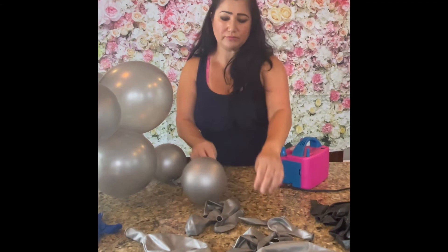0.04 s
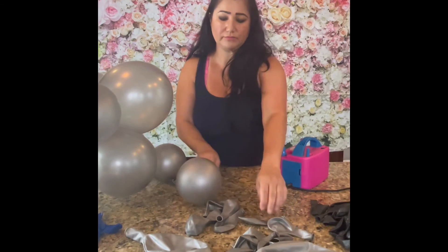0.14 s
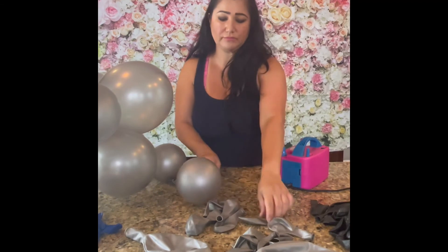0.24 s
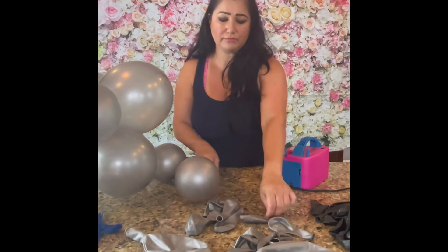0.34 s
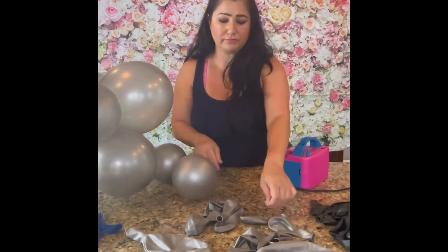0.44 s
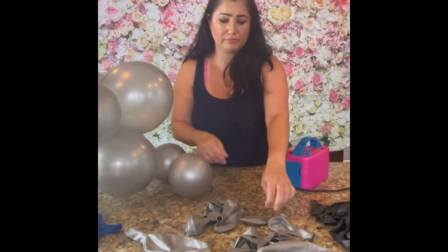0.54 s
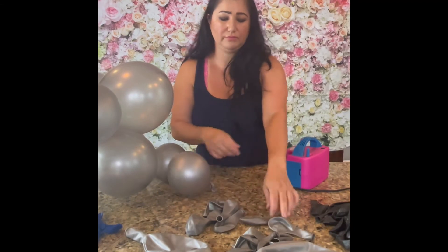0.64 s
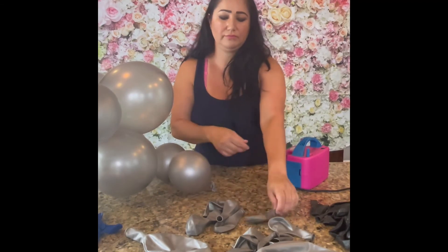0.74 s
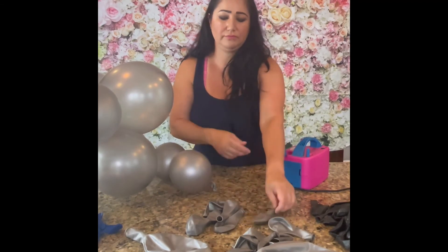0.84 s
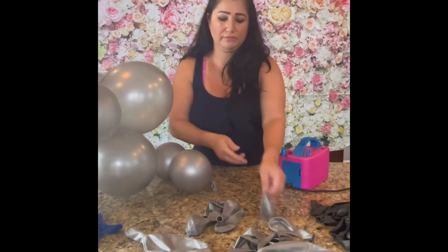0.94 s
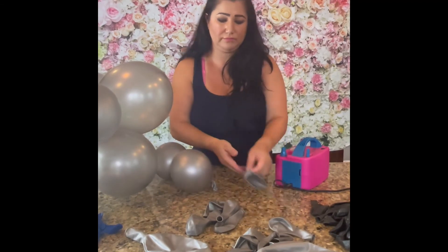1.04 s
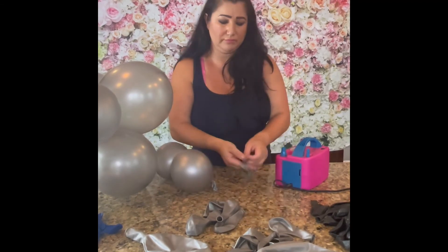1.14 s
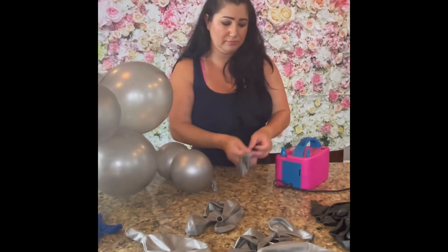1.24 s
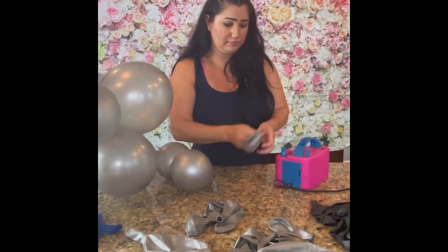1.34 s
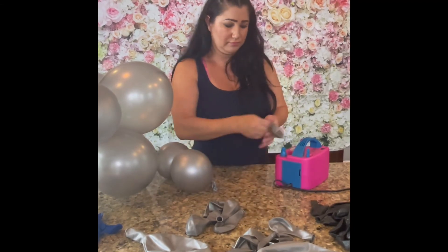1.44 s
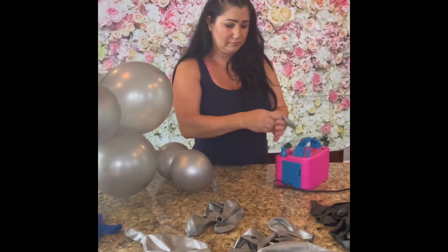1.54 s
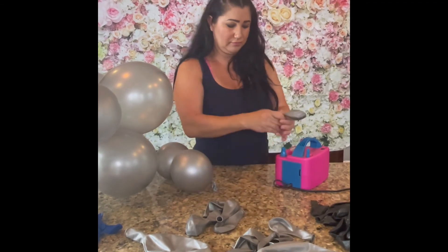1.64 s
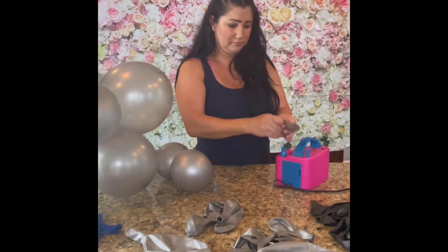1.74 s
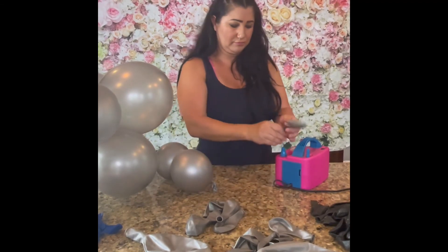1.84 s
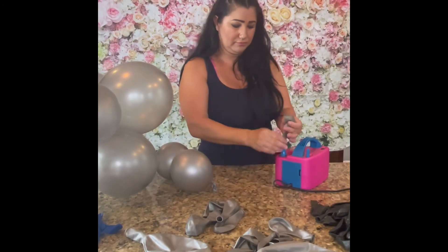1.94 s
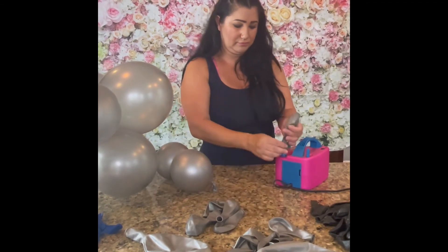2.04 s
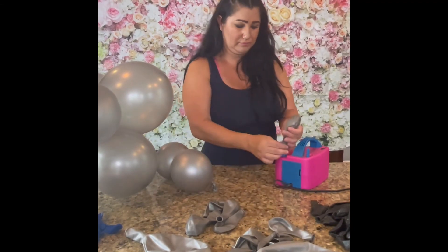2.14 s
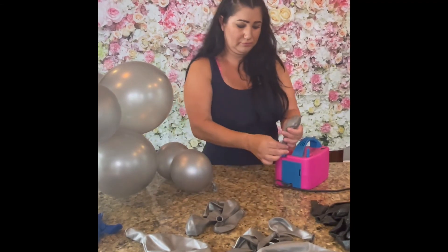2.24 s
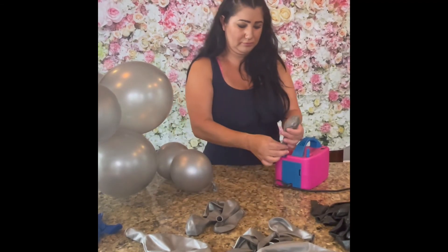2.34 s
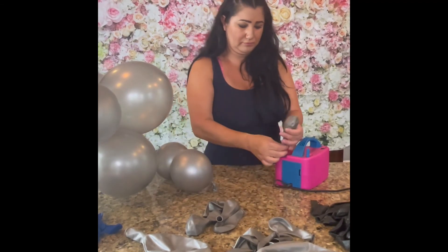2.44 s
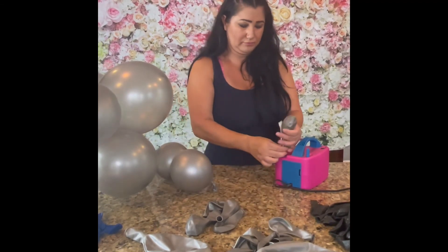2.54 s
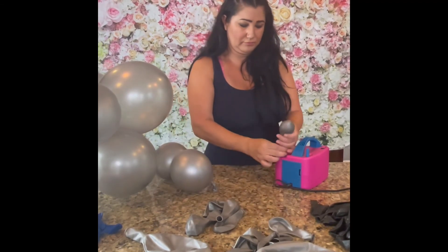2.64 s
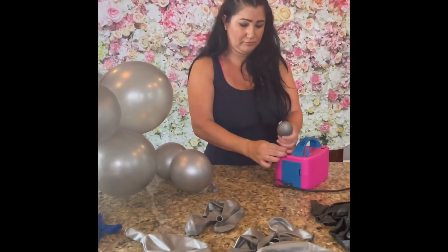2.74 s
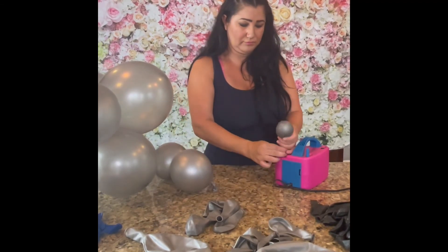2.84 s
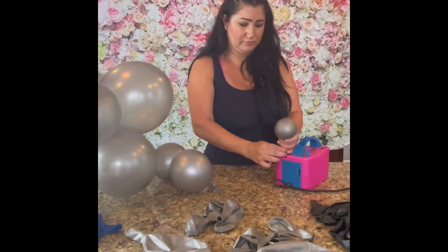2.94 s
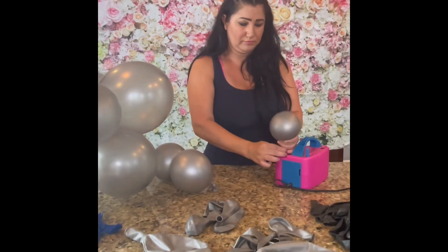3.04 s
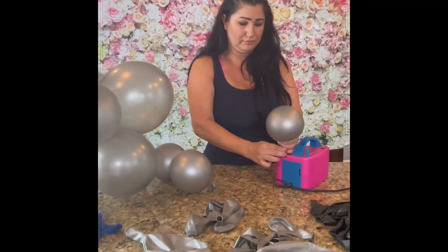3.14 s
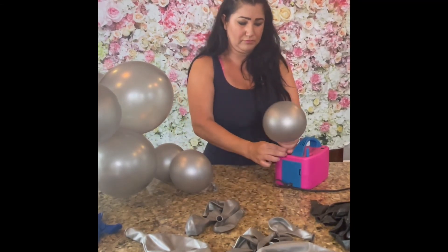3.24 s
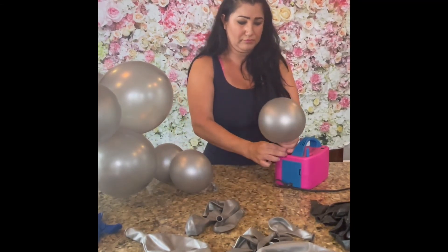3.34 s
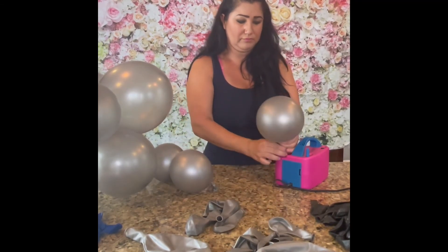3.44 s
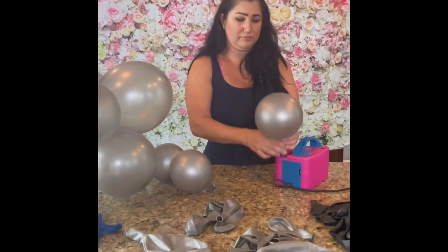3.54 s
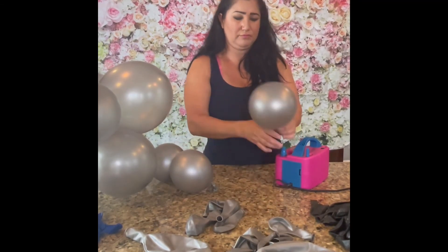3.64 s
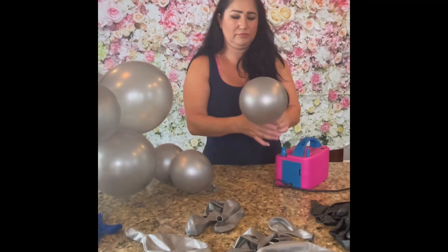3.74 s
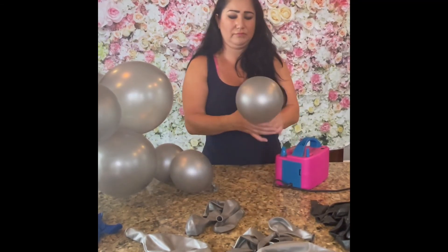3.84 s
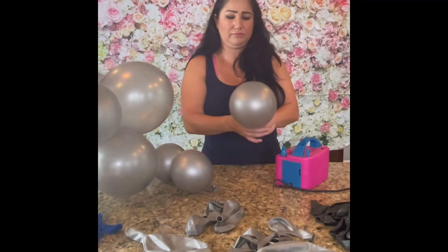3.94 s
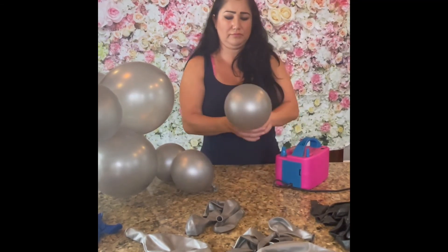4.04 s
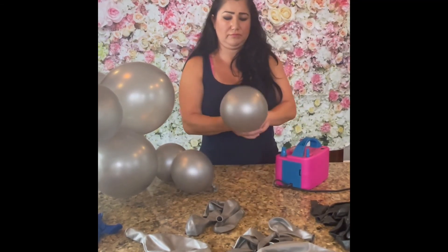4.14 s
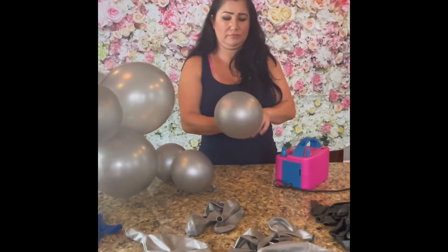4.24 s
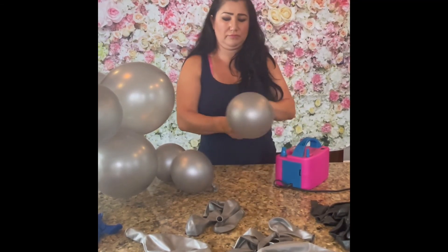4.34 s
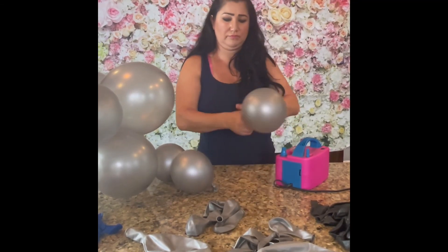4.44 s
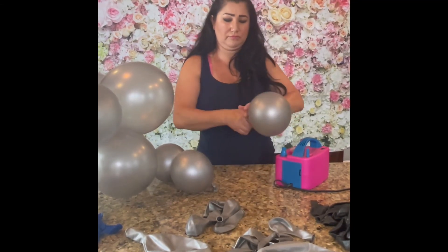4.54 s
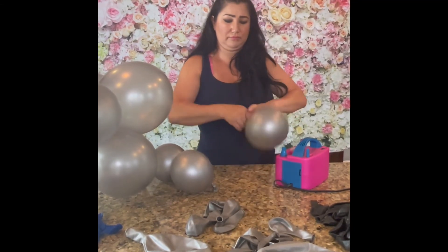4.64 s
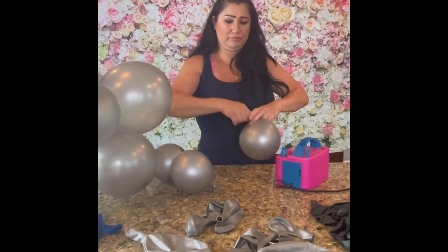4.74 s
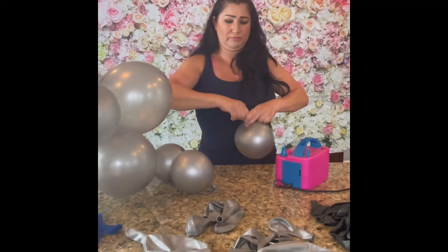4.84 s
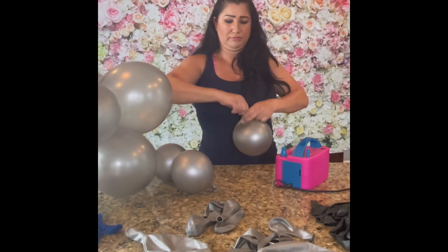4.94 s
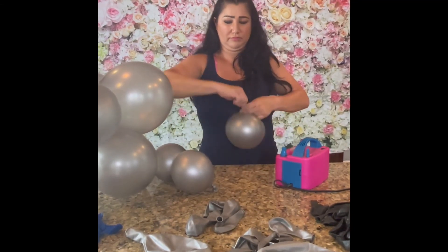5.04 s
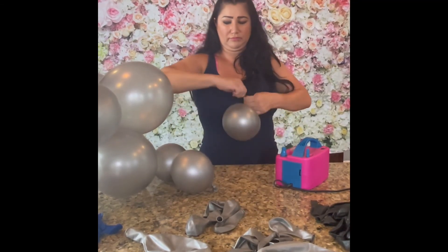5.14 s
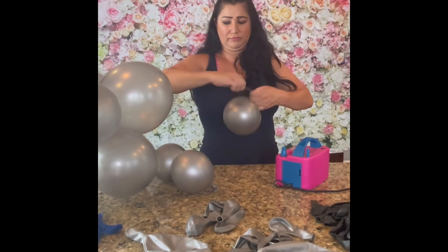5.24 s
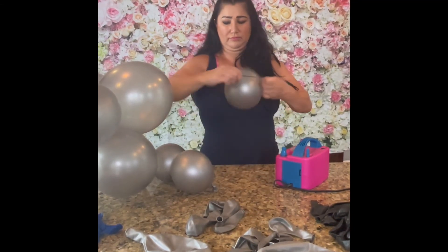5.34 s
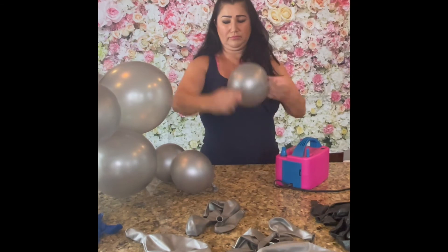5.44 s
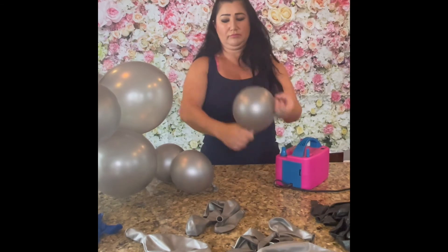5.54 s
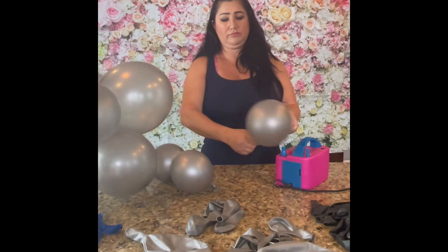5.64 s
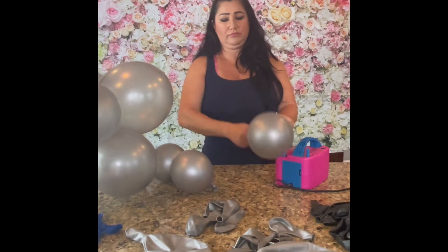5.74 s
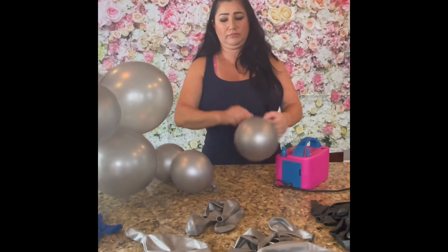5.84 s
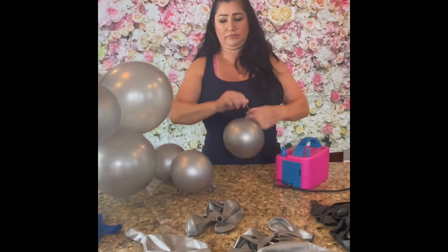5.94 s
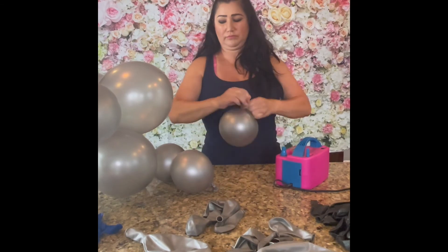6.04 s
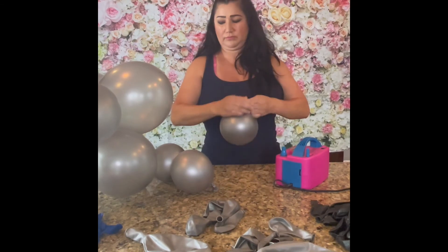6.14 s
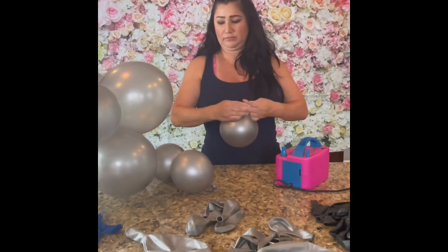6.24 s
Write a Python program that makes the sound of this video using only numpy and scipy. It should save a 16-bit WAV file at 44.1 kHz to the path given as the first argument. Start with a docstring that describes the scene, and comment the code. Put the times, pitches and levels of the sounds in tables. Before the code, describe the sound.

Faint latex rubbing and taps, then a small electric inflator roars for a second, a balloon squeaks off the nozzle, and the fan whirs down.

```python
"""In a room, the fan of an electric inflator still whirs faintly from its last run; a full balloon is knocked,
and fingers rub, tap and rustle limp latex at a stone counter (rubs, swishes: noise; taps, knocks: decaying modes).
The motor is switched on: hum and whine sweep with the shaft, air rushes in, and the latex neck flutters and leaks.
It is switched off and the neck snaps off the nozzle with squeaks and a spill of air, soon pinched shut.
The fan coasts down, its tones and air following one shaft speed, while fingers knock and pluck the balloon to tie it."""
import sys
import numpy as np
from scipy import signal
from scipy.fft import rfft, irfft
from scipy.io import wavfile
from scipy.ndimage import uniform_filter1d

SR = 44100
rng = np.random.default_rng(int(sys.argv[2]) if len(sys.argv) > 2 else 0)


def unload_audio(sound):
    """Save the sound as a 16-bit wav file, at the path given as the first command line argument."""
    columns = np.transpose(np.atleast_2d(sound))
    # keep every value between -1 and 1, then stretch to whole-number steps
    steps = np.round(np.clip(columns, -1, 1) * 32767)
    wavfile.write(sys.argv[1], SR, steps.astype(np.int16))


N = 277830
T = np.arange(N) / SR
FREQS = np.fft.rfftfreq(2 * N, 1 / SR)

# the switch is pressed and let go, the neck slips off the nozzle
ON_S, OFF_S, RELEASE_S = 2.525, 3.42, 3.545
# the shaft creeps towards its top speed (turns per second); a bend under 1 makes the start steeper
TOP_SPEED_HZ, SPIN_UP_S, SPIN_UP_BEND = 682.7, .192, .8
STICK_S = .012  # the rotor sticks for a moment before it turns
# share of the speed lost to the bearings and, at top speed, to the air
FRICTION_PER_S, DRAG_PER_S = .345, .325


def shaft():
    """Rotor dynamics: turns per second, driven up while switched on, then braked by friction and air drag."""
    running = np.minimum(since(ON_S + STICK_S), OFF_S - ON_S - STICK_S)
    driven = TOP_SPEED_HZ * (1 - np.exp(-(running / SPIN_UP_S) ** SPIN_UP_BEND))
    braking = (1 + DRAG_PER_S / FRICTION_PER_S) * np.expm1(FRICTION_PER_S * since(OFF_S))
    return driven / (1 + braking)


# the hum's rise, and its ring after switching off
HUM_ATTACK_S, HUM_T60_S = 0.066, 0.86


def power():
    """Switching transient: a smooth rise to 1 after switching on, an exponential decay after switching off."""
    return envelope(ON_S + STICK_S, HUM_ATTACK_S, OFF_S, HUM_T60_S)


# gain at standstill, and its drop at top speed
STALL_DB, BACK_EMF_DB = -11, -39


def current(speed):
    """Back-EMF: the motor draws most at standstill and less as it gathers speed."""
    return power() * undb(STALL_DB + BACK_EMF_DB * speed / TOP_SPEED_HZ)


HUM_HZ = 120
# overtones of the mains hum: multiple of HUM_HZ, relative level/dB
HUM_OVERTONES = [(1, 4.5), (2, -19.5), (3, -22.5), (5, -37)]


def mains_hum(speed):
    """Magnetic force: the current makes the iron hum in harmonics of a fixed frequency."""
    mains = 2 * np.pi * HUM_HZ * T
    return current(speed) * sum(undb(db) * np.sin(k * mains) for k, db in HUM_OVERTONES)


# overtones of the unbalanced fan: multiple of the shaft speed, relative level/dB
FAN_OVERTONES = [(1, 0.5), (2, -18)]
# modes of the inflator on the counter, which the tone sweeps through: f/Hz, width/Hz, relative level/dB
MOUNT_MODES = [(172, 94, -5), (213.7, 15.4, 0.5), (244.8, 6.2, 6.5), (282, 7.5, 0.5), (315, 40, -4.5),
               (413, 10.2, 1.5), (461.5, 8.2, -0.5), (484, 16.3, 1), (530.5, 20, 1), (563.6, 5.7, -3),
               (596, 13.6, 0), (619.5, 14.5, 0.5), (637.6, 7, -0.5), (667.3, 10.5, 8.5)]
MOUNT_BUILD_S = 0.044  # the modes take time to build, so a fast sweep passes them smoothly
# gain at top speed, and the extra while the motor pulls
UNBALANCE_DB, PULL_DB = -26, 4


def fan_tone(speed, turn, waver_db=1.34):
    """Rotating unbalance: the force grows with speed squared and swells at each mode it passes."""
    tone = sum(undb(db + waver_db * k * walk(25.254)) * np.sin(k * turn) for k, db in FAN_OVERTONES)
    mode_gain = np.interp(speed, FREQS, abs(resonances(MOUNT_MODES)))
    swell = uniform_filter1d(mode_gain, int(MOUNT_BUILD_S * SR))
    force = (speed / TOP_SPEED_HZ) ** 2
    return tone * force * swell * undb(UNBALANCE_DB + PULL_DB * power())


# whistle of the fan blades at top speed: multiple of the shaft speed, level/dB
BLADE_OVERTONES = [(7, -36)]


def blade_whistle(speed, turn, shake, waver_db=4.5, growth=4):
    """Blade passing: a multiple of the shaft speed whistles in fits, louder with speed."""
    tones = sum(undb(db + waver_db * walk(23.09)) * np.sin(k * turn + 0.9 * shake) for k, db in BLADE_OVERTONES)
    return tones * (speed / TOP_SPEED_HZ) ** growth


# modes of the panels that the rattling rotor shakes: f/Hz, width/Hz, relative level/dB
PANEL_MODES = [(644, 14, -6), (685, 16, 4), (726.5, 16, 6.5), (760, 22, -2), (793, 30, 0), (840, 27, -13),
               (1194, 50, -17), (1230, 70, -16)]
# the rotor rattles in its bearings around one critical speed
CRITICAL_HZ, CRITICAL_OCTAVES = 243, 0.38
RATTLE_DB = -45


def bearing_rattle(speed, turn, shake, waver_db=-0.8):
    """Critical speed: a loose rotor's lines swell and beat as they slide through the panel modes."""
    third = np.sin(3 * turn + shake)
    fifth = np.sin(5 * turn + shake)
    octaves_off = np.log2((speed + 1) / CRITICAL_HZ)
    loose = np.exp(-(octaves_off / CRITICAL_OCTAVES) ** 2)
    shaken = through((third + fifth) * loose, resonances(PANEL_MODES))
    return shaken * undb(RATTLE_DB + waver_db * walk(30))


def motor(speed, wobble=0.00278):
    """Superposition: the mains hum adds to fan tones whose phase is the integral of one wobbling shaft speed."""
    turn = 2 * np.pi * np.cumsum(speed * (1 + wobble * walk(40))) / SR
    # the rotor shakes, which smears its upper tones
    shake = 2 * np.pi * np.cumsum(speed * .031 * walk(900)) / SR
    tones = mains_hum(speed) + fan_tone(speed, turn)
    tones += blade_whistle(speed, turn, shake) + bearing_rattle(speed, turn, shake)
    return np.sqrt(2) * tones


# whine of the armature: multiple of the shaft speed, relative level/dB
SLOT_OVERTONES = [(3, 7), (4, -15), (12, 2.5), (24, -15)]
# resonances of the plastic housing: f/Hz, width/Hz, relative level/dB
HOUSING_MODES = [(1235, 236, -4), (2340, 270, -18), (3450, 370, 2), (4630, 400, 6.5), (5540, 780, -7)]
RADIATE_HZ = 1080  # the small housing hardly radiates the whine below this
# gain at standstill, its drop at top speed and its rise
WHINE_DB, WHINE_DROP_DB, WHINE_ATTACK_S = -12, -31, 0.089


def whine(speed, shake=0.031, buzz=0.4, stutter_db=3.5):
    """Slot harmonics: they sweep through the housing's resonances, throb with the hum and fade with current."""
    turn = 2 * np.pi * np.cumsum(speed * (1 + shake * walk(900))) / SR
    slots = sum(undb(db + stutter_db * walk(90)) * np.sin(k * turn) for k, db in SLOT_OVERTONES)
    throb = 1 + buzz * np.sin(2 * np.pi * HUM_HZ * T)
    pull = envelope(ON_S, WHINE_ATTACK_S, OFF_S, HUM_T60_S)
    pull *= undb(WHINE_DB + WHINE_DROP_DB * speed / TOP_SPEED_HZ)
    radiation = 1 / (1 + (RADIATE_HZ / (FREQS + 1)) ** 7)
    return through(slots * throb * pull, resonances(HOUSING_MODES) * radiation)


# spectrum of turbulence in the fan: f/Hz, relative level/dB
CHURN_SPECTRUM = [(40, -27), (130, -4), (300, 2), (550, -0.5), (850, 2.5), (1220, -2.5), (1550, -12.5),
                  (2200, -3), (3300, -3.5), (5000, -42)]
# gain at top speed, and the power of the speed it follows
CHURN_DB, CHURN_POWER = -32, 1.436
BRUSH_DB = -9  # scrape of the brushes, against the current gain


def churn(speed):
    """Turbulence: low noise follows a power of the speed; the brushes' scrape adds in energy."""
    turbulence = undb(CHURN_DB) * (speed / TOP_SPEED_HZ) ** CHURN_POWER
    return flickering(CHURN_SPECTRUM, np.hypot(turbulence, undb(BRUSH_DB) * current(speed)))


# spectrum of the outlet's rush: f/Hz, relative level/dB
RUSH_SPECTRUM = [(1000, -33), (1700, -6.5), (2200, -7), (3300, 4), (4200, 2.5), (4700, 2.5), (5200, 2),
                 (6100, 0.5), (7200, 2.5), (8300, 12), (9600, -25), (11000, -51)]
# gain at top speed, power of the speed, and the drop as the balloon fills
RUSH_DB, RUSH_POWER, RUSH_CHOKE_DB = -23, 2.16, -3.5
FLUTTER_AIR_DB = -2  # air that leaks past the fluttering neck, against its rasp


def rush(speed):
    """Jet noise: it follows a power of the speed, throttled by the filling balloon; flutter leaks add in energy."""
    outlet = undb(RUSH_DB + RUSH_CHOKE_DB * fill()) * (speed / TOP_SPEED_HZ) ** RUSH_POWER
    return flickering(RUSH_SPECTRUM, np.hypot(outlet, undb(FLUTTER_AIR_DB) * swells(FLUTTER_BOUTS)))


# spectrum of the nozzle's hiss: f/Hz, relative level/dB
HISS_SPECTRUM = [(6500, -43), (8700, -79), (9800, 7), (11300, 10.5), (11900, 7), (12500, -1.5), (13300, -6),
                 (14500, -31)]
# gain at top speed, its drop towards standstill, and its drop as the balloon fills
HISS_DB, HISS_DROP_DB, HISS_CHOKE_DB = -17, -43, -12.5
FLOW_LAG_S = 0.055  # the air takes a moment to get going


def hiss(speed):
    """Flow inertia: the nozzle's treble noise lags the switch, fades with speed and is throttled by filling."""
    flow = 1 - np.exp(-since(ON_S) / FLOW_LAG_S)
    slowness = 1 - speed / TOP_SPEED_HZ
    return flickering(HISS_SPECTRUM, flow * undb(HISS_DB + HISS_DROP_DB * slowness + HISS_CHOKE_DB * fill()))


def fill():
    """Back-pressure: the balloon fills from 0 to 1, until the neck slips off."""
    return since(ON_S) / (RELEASE_S - ON_S) * (T < RELEASE_S)


def flickering(spectrum, gain, flicker_db=1.66):
    """Random modulation: a coloured air noise whose level flickers."""
    return noise(colour(spectrum)) * gain * undb(flicker_db * walk(30))


# resonances of the neck: f/Hz, width/Hz, relative level/dB
NECK_MODES = [(1750, 720, -4), (2400, 700, -2), (2500, 580, -9)]
# bouts of the latex neck fluttering in the air stream: middle t/s, half length/s, level/dB
FLUTTER_BOUTS = [(3.11, 0.11, -26.5), (3.28, 0.079, -32.5), (3.32, 0.04, -28.5)]


def flutter(rasp, flap_db=2):
    """Flow-induced vibration: the neck's resonances rasp in bouts on the nozzle."""
    return unit(through(rasp, resonances(NECK_MODES) ** 2)) * swells(FLUTTER_BOUTS) * undb(flap_db * walk(110))


# whistle of air past the stretching neck: f/Hz, width/Hz, relative level/dB
LEAK_MODES = [(5340, 820, 5.5), (6430, 950, 0.5)]
# its swells: middle t/s, half length/s, level/dB
LEAK_SWELLS = [(3.1, 0.13, -30), (3.215, 0.048, -30.5), (3.38, .08, -36)]


def leak():
    """Narrow-band flow noise: a thin whistle swells as air slips past the stretching neck."""
    return noise(resonances(LEAK_MODES) ** 2) * swells(LEAK_SWELLS)


# air resonances in the full balloon: f/Hz, width/Hz, relative level/dB
CAVITY_MODES = [(1770, 980, -18), (2380, 880, 2.5), (2720, 100, 15.5), (2900, 120, 5), (3550, 37, -15),
                (3440, 110, 7)]
# the spill starts as the seal opens; its treble is muffled
SPILL_S, SPILL_DB, SPILL_ATTACK_S, SPILL_T60_S, SPILL_TOP_HZ = 3.541, -18, 0.0062, 0.52, 7040
PINCH_S, PINCH_T60_S = 3.68, 0.081  # fingers pinch the neck shut


def spill(rasp):
    """Cavity resonance: escaping air rings the balloon until the neck is pinched shut."""
    muffle = 1 / (1 + (FREQS / SPILL_TOP_HZ) ** 2)
    escape = envelope(SPILL_S, SPILL_ATTACK_S, SPILL_S, SPILL_T60_S) * decay(since(PINCH_S), PINCH_T60_S)
    return unit(through(rasp, resonances(CAVITY_MODES) * muffle)) * undb(SPILL_DB) * escape


# latex squeaks: t/s, length/s, start f/Hz, end f/Hz, level/dB of the fundamental
SQUEAK_EVENTS = [(1.894, 0.0065, 2540, 2170, -56), (3.301, 0.01, 2360, 2310, -18.5),
                 (3.315, 0.0077, 2456, 2150, -16), (3.5478, 0.0071, 2800, 2500, -15),
                 (3.554, 0.0047, 3890, 3100, -16), (3.559, .0025, 3000, 2840, -18),
                 (5.29, 0.005, 1830, 1590, -41), (5.678, 0.0042, 2070, 1850, -42),
                 (5.844, 0.0065, 2530, 2500, -38)]


def squeaks():
    """Stick-slip friction: slipping latex gives short gliding tones with an octave overtone."""
    out = np.zeros(N)
    for start, length, from_hz, to_hz, db in SQUEAK_EVENTS:
        slips = 2 * np.pi * np.cumsum(np.linspace(from_hz, to_hz, int(length * SR))) / SR
        tone = np.sin(slips) + 0.57 * np.sin(2 * slips)
        add(out, start, undb(db) * signal.windows.tukey(len(slips), .5) * tone)
    return out


def neck(rough_db=0.0):
    """Common excitation: one rough noise drives the flutter and the spill, beside the leak and squeaks."""
    rasp = rng.standard_normal(N) * undb(rough_db * walk(410))
    return flutter(rasp) + leak() + spill(rasp) + squeaks()


# knocks on the full balloon: t/s, level/dB before halving, brightness f/Hz, pitch ratio set by the grip
KNOCK_EVENTS = [(0.025, -39, 201, 0.92), (0.035, -38, 260, 0.92), (3.5585, -22.5, 300, 0.98),
                (4.854, -43, 160, 1), (5.553, -27, 700, 0.97), (5.743, -41.5, 900, 0.92),
                (5.8402, -25, 1330, 0.98), (5.876, -33.5, 700, 0.99), (6.073, -38, 880, 0.9)]
# modes of its skin: f/Hz before the grip's ratio, relative level/dB, t60/s
SKIN_MODES = [(148, -5.5, 0.16), (283.3, -1, 0.18), (355, -2.5, 0.27), (433, 4.5, 0.038), (498.7, -1, 0.25),
              (620, -10, 0.2), (713, 7, 0.018), (940, -10, 0.29), (1320, -15, 0.092), (1600, -5, 0.025),
              (2170, 2, 0.04), (2435, -7, 0.11)]
KNOCK_ATTACK_S = 0.00065  # soft flesh starts the modes gradually


def knocks():
    """Membrane modes: knocked skin rings at pitches shifted by the grip; softer touch weakens high modes."""
    out = np.zeros(N)
    for start, db, bright_hz, grip in KNOCK_EVENTS:
        skin = 0
        for k, (hz, mode_db, t60) in enumerate(SKIN_MODES):
            gain = (-1) ** k * undb(mode_db) / np.hypot(1, hz / bright_hz)
            skin = skin + gain * ring(hz * grip, t60, KNOCK_ATTACK_S)
        add(out, start, undb(db) * skin / 2)
    return out


# dull bumps of the hands: t/s, level/dB, f/Hz, t60/s
BUMP_EVENTS = [(.02, -33.5, 62.6, 0.079), (0.029, -41.5, 276, 0.34), (0.123, -37.5, 179, 0.083),
               (1.84, -44.5, 120.6, 0.94), (1.898, -45, 121.5, 0.42), (1.909, -47.5, 72.5, 0.93),
               (3.557, -35, 74, 0.073), (4.856, -30.5, 171, 0.11), (4.861, -27, 107, 0.082),
               (4.874, -35.5, 65.6, 0.25), (4.877, -34, 200, .06), (5.571, -44.5, 66, 0.4),
               (5.853, -44, 80, .15)]
BUMP_ATTACK_S = 0.0038


def bumps():
    """Soft impact: flesh starts single low modes gradually."""
    out = np.zeros(N)
    for start, db, hz, t60 in BUMP_EVENTS:
        add(out, start, undb(db) * ring(hz, t60, BUMP_ATTACK_S))
    return out


# fingers on counter, housing and balloon: t/s, level/dB, t60/s, ring f/Hz, ring against crack/dB, brightness f/Hz
TAP_EVENTS = [(.131, -53, .06, 517, -6, 2000), (.216, -42, 0.017, 1550, 0, 3000),
              (.724, -52, .06, 750, -5, 2000), (.897, -47.5, 0.052, 2980, -9, 7000),
              (0.9056, -34.5, 0.02, 1890, -10, 8000), (.911, -46, 0.065, 650, 0, 5000),
              (.932, -49, .035, 328, -3, 1100), (.97, -52, 0.078, 900, -6, 3000),
              (1.555, -61, 0.014, 2610, 6, 9000), (2.044, -44.5, 0.052, 1340, -11, 12000),
              (2.058, -44.5, 0.025, 1010, -7, 8000), (2.452, -46, 0.043, 590, -2, 9000),
              (2.53, -28.5, 0.094, 1170, -3, 9000), (5.29, -32, 0.019, 1720, -9, 8000),
              (5.553, -37, .035, 640, -1, 4000), (5.68, -37, 0.0087, 1950, -5, 4000),
              (5.839, -25, 0.022, 453, -4, 2300)]
# spectrum of their cracks: f/Hz, relative level/dB
TAP_SPECTRUM = [(100, -20), (400, 13), (700, 14.5), (1200, 8), (1600, -4), (2300, 3), (3400, -2.5),
                (5000, -7), (11000, -26), (14000, -31)]


def taps():
    """Impact excitation: a crack, duller for a softer touch, and a brief ring of what is hit."""
    cracks, bodies = np.zeros((2, N))
    for start, db, t60, hz, ring_db, bright_hz in TAP_EVENTS:
        touch = signal.butter(2, min(bright_hz, SR / 3), fs=SR, output="sos")
        add(cracks, start, undb(db) * signal.sosfilt(touch, crack(t60)))
        add(bodies, start, undb(db + ring_db) * ring(hz, t60))
    return bodies + through(cracks, unit(colour(TAP_SPECTRUM)))


# sharp snaps of latex and of the switch: t/s, level/dB, t60/s
SNAP_EVENTS = [(.905, -67, 0.033), (2.045, -72, 0.014), (2.45, -57, 0.044), (2.528, -44, 0.052),
               (3.547, -12.5, 0.13), (3.608, -18, 0.0099), (3.62, -21, .008), (3.67, -18, 0.0047),
               (5.866, -34, 0.054), (5.874, -25.5, 0.013)]
# their spectrum: f/Hz, relative level/dB
SNAP_SPECTRUM = [(40, -41), (200, -5), (1500, 7.5), (3000, -3), (5000, 10.5), (8500, 11), (11300, 19),
                 (13000, 1), (14500, -11)]


def snaps():
    """Sudden release: bursts of coloured noise without a ringing mode."""
    out = np.zeros(N)
    for start, db, t60 in SNAP_EVENTS:
        add(out, start, undb(db) * crack(t60))
    return through(out, unit(colour(SNAP_SPECTRUM)))


# strokes of limp latex through the fingers: middle t/s, half length/s, level/dB before rub_db
RUB_STROKES = [(.03, 0.052, -61.5), (.15, 0.062, -73), (.28, 0.057, -65), (.4, 0.33, -75),
               (.73, 0.045, -66.5), (.95, 0.12, -78), (1.14, 0.14, -63), (1.28, 0.031, -74),
               (1.5, 0.068, -64.5), (1.75, 0.053, -65), (1.89, 0.063, -60.5), (2.49, 0.07, -67.5)]
# their spectrum: f/Hz, relative level/dB
RUB_SPECTRUM = [(300, 18), (1000, -6.5), (1600, -10), (2600, 2), (4000, -0.5), (4900, 3), (5800, -2.5),
                (6600, -5.5), (7500, -2.5), (9000, -3.5), (11200, 0.5), (12500, -18), (14500, -18)]


def rubbing(crinkle_db=3, rub_db=3):
    """Friction noise: fingers stroke latex, with a crinkling level."""
    return noise(colour(RUB_SPECTRUM)) * swells(RUB_STROKES) * undb(rub_db + crinkle_db * walk(180))


# swishes of latex sliding past latex and skin: middle t/s, half length/s, level/dB
SWISH_STROKES = [(.28, 0.046, -72), (1.13, 0.17, -71), (1.28, 0.027, -77)]
# their resonance: f/Hz, width/Hz, relative level/dB
SWISH_MODES = [(5760, 2000, 0)]


def swishing(crinkle_db=3):
    """Resonant friction noise: sliding latex swishes in one broad treble band."""
    return noise(resonances(SWISH_MODES) ** 2) * swells(SWISH_STROKES) * undb(crinkle_db * walk(120))


# rustles of limp balloons being moved: middle t/s, half length/s, level/dB
RUSTLE_SWELLS = [(.04, 0.061, -57), (.945, 0.04, -57.5), (1.05, 0.081, -75)]
# the tiny pops that make up a rustle: rate, pitch range and ring
FOLDS_PER_S, FOLD_LOW_HZ, FOLD_HIGH_HZ, FOLD_T60_S = 510, 507, 3200, 0.01


def rustle(spread_db=6.0, tilt_db=-6.0):
    """Snap-through buckling: folds of limp rubber flip one by one, each a tiny pop; higher ones are fainter."""
    out = np.zeros(N)
    t = T[:int(FOLD_T60_S * SR)]
    for when, pitch, size in rng.random((int(FOLDS_PER_S * N / SR), 3)):
        hz = FOLD_LOW_HZ * (FOLD_HIGH_HZ / FOLD_LOW_HZ) ** pitch
        db = spread_db * min(-np.log(1 - size), np.pi) + tilt_db * np.log2(hz / FOLD_LOW_HZ)
        add(out, when * T[-1], undb(db) * np.sin(2 * np.pi * hz * t) * decay(t, FOLD_T60_S))
    return unit(out) * swells(RUSTLE_SWELLS)


# the coasting fan's pitch, how fast that sinks, its gain and decay
COAST_HZ, COAST_FALL_PER_S, COAST_DB, COAST_T60_S = 395, .95, -68, 2.8
# resonances that it sinks through: f/Hz, width/Hz, relative level/dB
COAST_MODES = [(1220, 160, -1), (2540, 730, -3.5), (3600, 600, -9)]


def coasting(waver_db=4, wobble=0.0173, count=11):
    speed = COAST_HZ * np.exp(-COAST_FALL_PER_S * T)
    turn = 2 * np.pi * np.cumsum(speed * (1 + wobble * walk(300))) / SR
    whir = sum(undb(waver_db * walk(32.7)) * np.sin(k * turn) for k in range(2, count))
    return through(whir * undb(COAST_DB) * decay(T, COAST_T60_S), resonances(COAST_MODES))


# spectrum of the room tone: f/Hz, relative level/dB
ROOM_SPECTRUM = [(25, -67), (45, -9.5), (70, 1.5), (100, -4.5), (150, 6), (220, -4.5), (330, -5), (460, -8),
                 (540, -21.5), (800, -24), (1200, -25.5), (1600, -38), (4000, -37), (7000, -49),
                 (11000, -40.5), (14000, -79)]
ROOM_TONE_DB = -54.5


def room_tone():
    """Stationary background: mostly low coloured noise whose level drifts slowly."""
    return noise(colour(ROOM_SPECTRUM)) * undb(ROOM_TONE_DB + 2.8 * walk(1.12))


# decay of the room in the bass and in the treble
ROOM_T60_S, ROOM_TREBLE_T60_S = 0.76, 0.54


def room(x, wet_db, bass_hz):
    """Reverberation: direct sound plus wall echoes, as pressure and sideways motion; treble dies first."""
    t = T[:SR * 3 // 5]
    echoes = rng.standard_normal((2, len(t))) * (t > .004)
    low = signal.sosfilt(signal.butter(1, 2500, fs=SR, output="sos"), echoes)
    tail = low * decay(t, ROOM_T60_S) + (echoes - low) * decay(t, ROOM_TREBLE_T60_S)
    wet = undb(wet_db) * FREQS ** 2 / (FREQS ** 2 + bass_hz ** 2)  # fewer echoes in the bass
    return through(x, (1 + wet * unit(rfft(tail, 2 * N))) / np.hypot(1, wet))


def undb(db):
    """Logarithmic level: decibels to gain."""
    return 10 ** (np.asarray(db) / 20)


def unit(x):
    """Normalization: scale to rms 1."""
    return x / np.sqrt(np.mean(abs(x) ** 2))


def through(x, response):
    """Linear filtering: multiply the spectrum by a frequency response."""
    return irfft(rfft(x, 2 * N) * response)[..., :N]


def colour(points):
    """Minimum phase: the causal response of a level spectrum, by folding its cepstrum."""
    hz, db = np.transpose(points)
    cepstrum = irfft(np.log(undb(np.interp(np.log(FREQS + 1), np.log(hz), db))))
    cepstrum[1:N] *= 2
    return np.exp(rfft(cepstrum[:N], 2 * N))


def resonances(modes):
    """Modal sum: the response of damped resonators in parallel."""
    out = 0
    for hz, width, db in modes:
        damping = 1j * FREQS * width
        out = out + undb(db) * damping / (hz ** 2 - FREQS ** 2 + damping)
    return out


def walk(hz):
    """Smoothed chance: a random course of rms near 1, stepping about hz times a second."""
    size = int(SR / hz)
    steps = np.repeat(rng.standard_normal(N // size + 2), size)
    return unit(uniform_filter1d(uniform_filter1d(steps, size), size)[:N])


def noise(response):
    """Filtered white noise: coloured, of rms 1."""
    return unit(through(rng.standard_normal(N), response))


def add(track, start, sound):
    """Superposition: mix a short sound in at a time."""
    first = max(int(start * SR), 0)
    track[first:first + len(sound)] += sound[:N - first]


def decay(t, t60):
    """Exponential damping: 60 dB down after t60."""
    return np.exp(-np.log(1000) * t / t60)


def ring(hz, t60, attack=1 / SR):
    """Damped oscillation: one struck mode; a soft touch starts it gradually."""
    t = T[:SR // 2]
    return np.sin(2 * np.pi * hz * t) * decay(t, t60) * np.minimum(t / attack, 1)


def crack(t60):
    """Impulsive noise: a burst that decays from its first sample."""
    t = T[:SR // 2]
    return rng.standard_normal(len(t)) * decay(t, t60)


def since(start):
    """Elapsed time: seconds gone by since a moment, 0 before it."""
    return np.maximum(T - start, 0)


def envelope(start, attack, stop, t60):
    """Attack and decay: a smooth rise, a hold, and an exponential decay after the stop."""
    rise = np.sin(np.pi / 2 * np.minimum(since(start) / attack, 1)) ** 2
    return rise * decay(since(stop), t60)


def swells(rows):
    """Gaussian envelopes: the gain of bell-shaped swells."""
    return sum(undb(db) * np.exp(-((T - middle) / half) ** 2) for middle, half, db in rows)


# phase between the two pickup ports: f/Hz, phase/rad
PORT_PHASE = [(110, 0.0038), (400, 0.39), (700, 0.6), (1900, 0.25), (2600, 1.34), (3500, 1.08),
              (4800, 2.66), (5400, 1.85), (6000, 0.038), (7000, 0.93), (8200, 2.714), (9200, 3.12),
              (11400, 1.1), (12200, 0.27)]


def scene():
    """Phase difference: two close ports trade sum for difference with frequency, in a reverberant room."""
    speed = shaft()
    air = churn(speed) + rush(speed) + hiss(speed)
    pump = room(motor(speed) + air + neck() + coasting(), wet_db=-3.5, bass_hz=774)
    pump += room(whine(speed), wet_db=-6, bass_hz=800)
    hands = knocks() + bumps() + taps() + snaps() + rubbing() + swishing() + rustle()
    handling = room(hands, wet_db=-4.0, bass_hz=151)
    pressure, sideways = pump + handling + room_tone()
    phase = np.interp(FREQS, *np.transpose(PORT_PHASE))
    mid = through(pressure, np.cos(phase / 2))
    side = through(sideways, 1j * np.sin(phase / 2))
    return np.array([mid - side, mid + side])


TOP_HZ = 14700


def record(dry):
    """Band limitation: a steep low-pass cuts the top."""
    return signal.sosfilt(signal.ellip(8, .2, 70, TOP_HZ, fs=SR, output="sos"), dry)


dry = scene()
out = record(dry)
unload_audio(out)
```